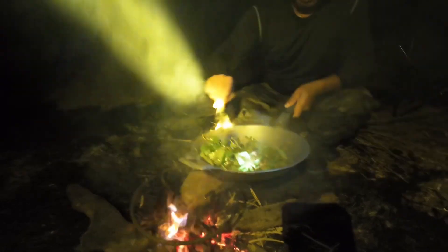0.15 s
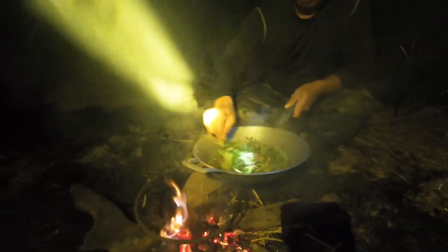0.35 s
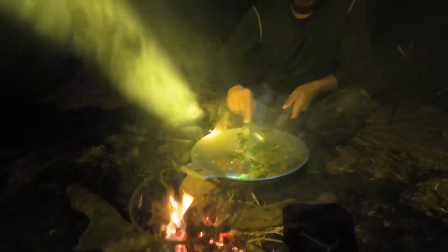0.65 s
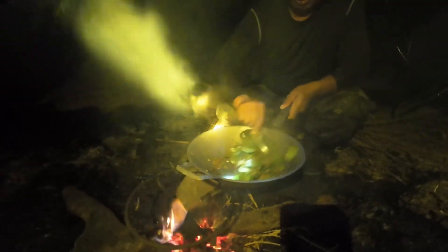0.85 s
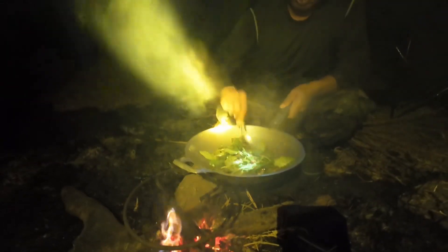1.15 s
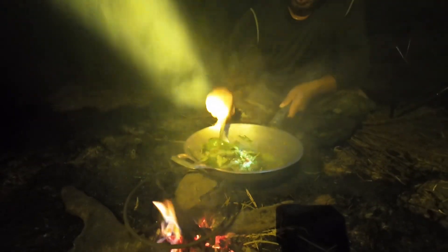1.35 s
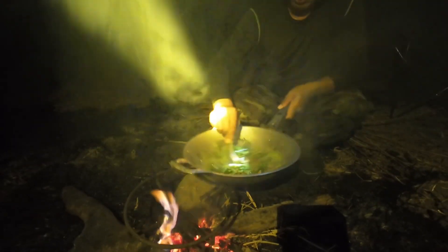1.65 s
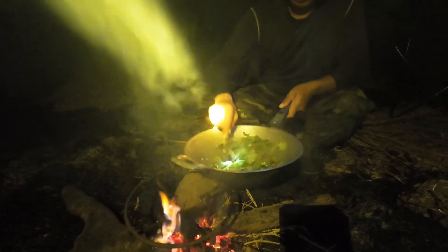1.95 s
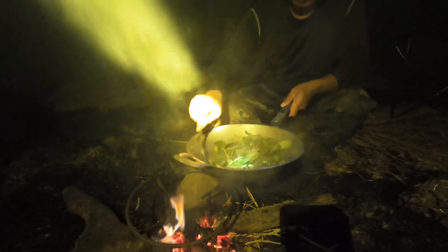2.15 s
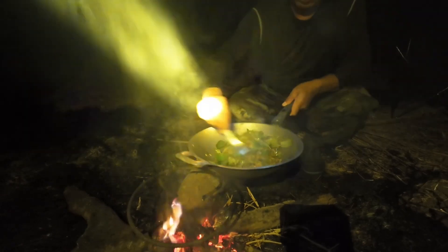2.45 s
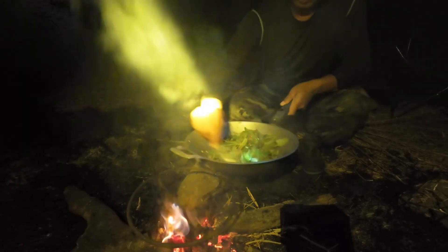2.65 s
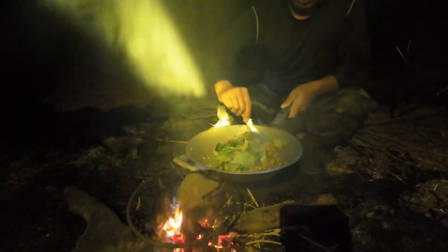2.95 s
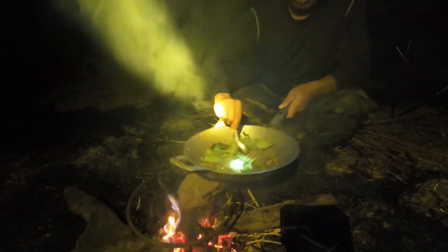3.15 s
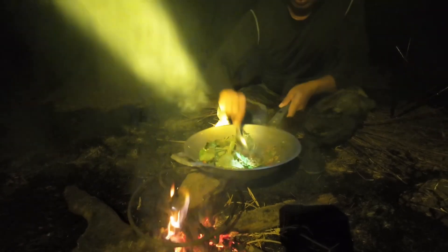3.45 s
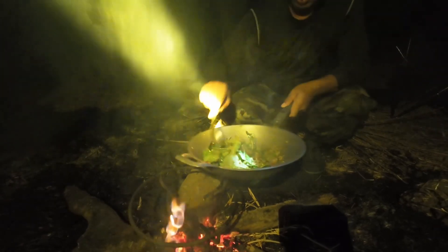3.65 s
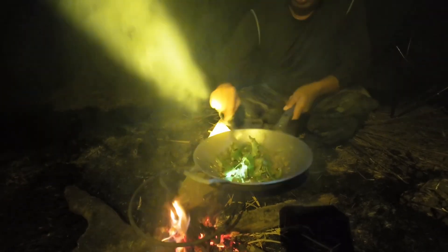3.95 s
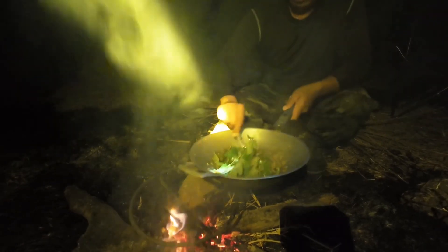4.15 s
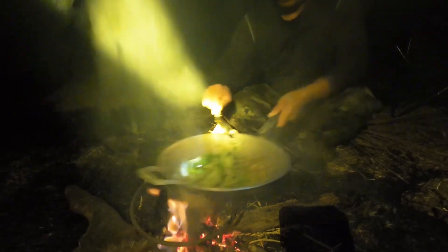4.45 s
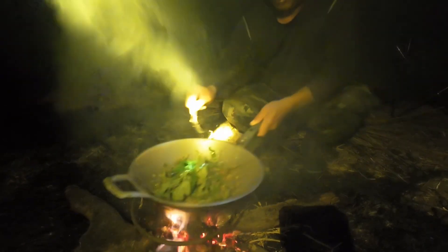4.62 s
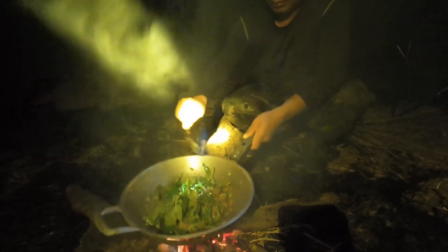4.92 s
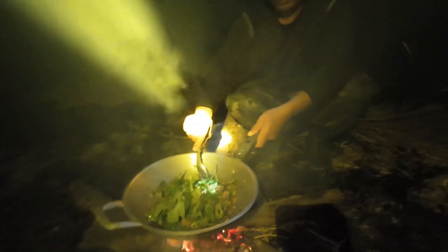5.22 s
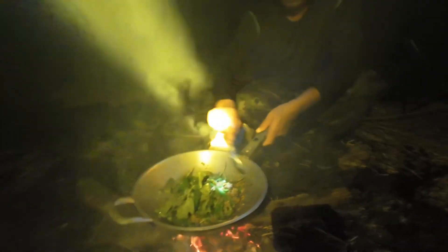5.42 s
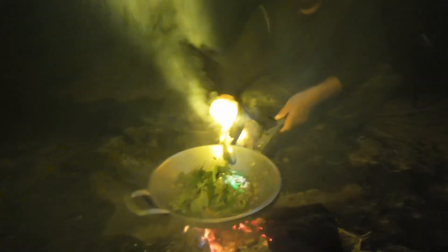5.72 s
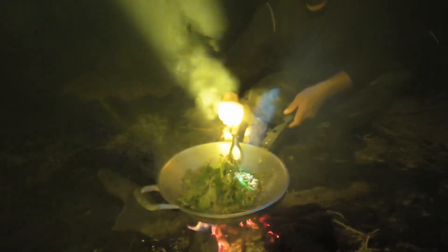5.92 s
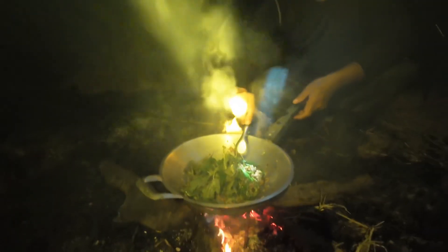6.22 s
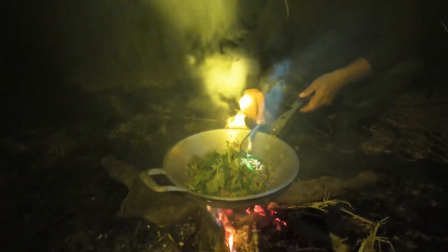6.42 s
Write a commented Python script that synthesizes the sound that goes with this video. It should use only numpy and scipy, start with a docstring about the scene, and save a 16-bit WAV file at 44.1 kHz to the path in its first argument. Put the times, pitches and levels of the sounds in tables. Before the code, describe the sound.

Greens sizzle in a pan over a fire while crickets trill, and a metal spoon taps and scrapes the pan.

```python
"""A field at night, the microphone by a metal pan on a small fire. From the start greens sizzle in fat over
night air, a low hum and a far buzzing chorus; close by a tree cricket trills, wing scraped on wing, and
others chirp further off, echoed by bushes and banks. Fat spits, and at 0.3 s a spoon strikes the pan.
Near 2 s the spoon scrapes and squeaks and the pan knocks on its stones. Towards 5 s the fire flares;
the hardest knock follows, then a run of ringing taps and scrapes."""
import sys
import numpy as np
from scipy import signal
from scipy.fft import rfft, irfft
from scipy.io import wavfile

SR = 44100
rng = np.random.default_rng(int(sys.argv[2]) if len(sys.argv) > 2 else 0)


def pcm_store(signal):
    """Save signal as 16-bit PCM."""
    levels = np.round(np.clip(np.atleast_2d(signal), -1, 1) * 32767)
    wavfile.write(sys.argv[1], SR, levels.astype(np.int16).T)


N = 290178

# night air over the field: (frequency [Hz], relative level [dB])
AIR_SPECTRUM = [(20, -6), (60, -2), (130, -15.5), (230, -34), (500, -32.5), (1100, -31), (1600, -25),
                (2600, -19.5), (4500, -31), (7000, -28), (16000, -37)]
# stereo width of air, fire and sizzle at the microphone: (frequency [Hz], side minus mid [dB])
STEREO_WIDTH = [(60, -5.5), (110, -13.5), (200, 0.5), (380, -4.5), (700, -9.5), (1290, -33), (2380, -41),
                (4400, -11), (8120, -15), (15000, -8)]
# partials of the low hum: (frequency [Hz], width [Hz], level [dB])
HUM_PARTIALS = [(61, 7.7, -51), (117.4, 6.2, -63), (178.5, 2.7, -67.5)]
# rumble of the fire: (time [s], level [dB])
FIRE_LEVELS = [(4.6, -66), (4.8, -50), (5.4, -50), (5.65, -45.5), (6.15, -47.5), (6.35, -57)]
# far chorus: (centre [Hz], width [Hz], pulse rate [Hz], pulse depth [0-1])
CHORUS_BUZZ = (2139, 214, 140, 0.57)
# steady frying: (time [s], level [dB])
SIZZLE_LEVELS = [(0, -45.5), (.7, -50), (1.3, -51.5), (1.75, -49), (2.45, -48.5), (3.1, -44), (3.6, -45),
                 (4.3, -45), (4.85, -45), (5.4, -42.5), (5.75, -45), (6.3, -41.5), (6.58, -47)]
# surges as wet leaves are turned onto hot metal: (peak time [s], level [dB])
SIZZLE_SURGES = [(0, -40.5), (1.36, -36.5), (1.66, -46.5), (2.56, -43.5), (2.94, -40), (3.95, -42.5),
                 (4.2, -59)]
# frying fat: (frequency [Hz], relative level [dB])
SIZZLE_SPECTRUM = [(700, -23.5), (1500, -8.5), (3000, 2.5), (6000, -3), (8000, -2.5), (10000, 0.5),
                   (11500, -3.5), (13200, 2), (14500, -1.5), (16000, 0)]

# one wing stroke of each cricket:
# (start pitch [Hz], end pitch [Hz], length [s], left minus right [dB], right lag [s], roughness [0-1])
NEAR_STROKE = (3640, 3230, .0235, 2.3, -.00002, .15)
HIGH_STROKE = (6450, 5950, 0.018, 6.5, 0.000039, 0.64)
NEIGHBOUR_STROKE = (6000, 5500, 0.02, 7.6, 0.000043, 0.32)
THIN_STROKE = (5450, 4650, .03, 2.5, .00002, .05)
LOW_STROKE = (2970, 2540, .045, -1.5, 0, .05)
# near cricket, a list of guiding strokes for each trill: (time [s], level [dB])
NEAR_TRILLS = [
    [(0.025, -31.5), (0.837, -34.5), (1.454, -31), (1.857, -33), (1.927, -31.5)],
    [(2.172, -32.5), (2.763, -31), (3.168, -30.5), (4.177, -32), (4.979, -32.5), (5.588, -31.5),
     (5.999, -34.5), (6.202, -32), (6.379, -32)],
]
# high cricket further off: (first stroke [s], level [dB])
FAR_HIGH_CHIRPS = [(0.027, -48), (0.223, -45), (0.476, -45.5), (0.725, -46), (0.97, -44), (1.266, -44.5),
                   (1.515, -45), (1.763, -46), (2.069, -45), (2.52, -43), (2.765, -43.5), (3.021, -43.5),
                   (3.261, -44), (3.523, -42), (3.779, -43), (4.019, -42), (4.282, -42.5), (4.526, -43.5),
                   (4.819, -43.5), (5.062, -45), (5.328, -44.5), (5.643, -42), (5.894, -39.5), (6.221, -42),
                   (6.471, -41)]
# thin and low crickets further off: (first stroke [s], length [s], level [dB])
FAR_THIN_PHRASES = [(.22, .045, -45), (.55, .15, -49), (.865, 0.093, -49), (1.175, .14, -52.5),
                    (3.373, 0.18, -49.5), (3.70, .153, -50), (3.985, 0.07, -51), (4.254, .154, -47.5),
                    (4.575, 0.2, -52), (4.896, .051, -52), (6.163, .114, -46), (6.408, 0.065, -45.5)]
FAR_LOW_PHRASES = [(1.845, .076, -46), (2.367, .153, -42.5), (2.894, .072, -42), (3.242, .073, -41.5),
                   (3.764, .083, -43), (4.734, 0, -46), (5.051, 0, -40), (5.638, 0, -41)]
# reflections off bushes and banks: (delay [s], gain [dB])
FIELD_ECHOES = [(.009, -14), (.017, -10.5), (.033, -11.5)]

# spits of fat: (time [s], level [dB])
FAT_SPITS = [(0.1535, -28.5), (0.6197, -36), (0.841, -30), (0.8574, -31.5), (1.0849, -35), (1.5225, -22.5),
             (1.7714, -28.5), (2.6768, -31), (3.1388, -27.5), (3.4416, -27.5), (3.69, -29), (4.1563, -25),
             (4.1912, -26.5), (4.5185, -30), (5.4768, -29), (5.691, -28), (5.7091, -24), (6.2914, -30)]
# pan against its stones: (time [s], level [dB], body pitch [Hz], t60 [s])
STONE_KNOCKS = [(.155, -52.5, 596, 0.054), (1.258, -49.5, 216, 0.14), (1.964, -32.5, 506, 0.072),
                (2.659, -42.5, 410, 0.058), (4.77, -56.5, 664, 0.14), (4.9762, -17.5, 180, 0.041),
                (4.976, -13.5, 662, 0.02), (4.999, -26, 650, 0.065), (5.034, -32, 442, 0.026),
                (5.075, -29.5, 204, 0.04), (5.841, -29, 700, 0.04)]
# spoon striking the pan: (time [s], crack level [dB], crack t60 [s], bowl ring [dB], rim ring [dB],
# bowl pitch favoured by the spot [Hz])
SPOON_TAPS = [(0.3217, -4.5, 0.025, -26, -24, 1180), (2.2555, -46, 0.0082, -52, -44, 790),
              (5.1367, -6, 0.027, -33, -24.5, 2210), (5.5349, -5.5, 0.041, -20.5, -49, 1630),
              (5.578, -36, 0.017, -21, -41, 2280), (5.8598, -15, 0.0065, -30, -35, 2364),
              (6.157, -30, 0.017, -52.5, -57, 1410), (6.363, -23.5, 0.0095, -41.5, -68, 1270)]
# spoon rubbing the pan, levels relative: (touch [s], speeding up [s], contact [s], fastest scrape [dB],
# its fall [dB/s], grind at touch [dB], at lift [dB], hollow pitch at touch [Hz], at lift [Hz])
SPOON_STROKES = [(.326, 0.0012, 0.097, -29.5, 250, -35, -78, 1200, 780),
                 (1.964, 0, 0.06, -31, 7, -45, -50, 598, 870),
                 (2.255, 0, .15, -40.5, 26, -54, -69, 797, 600),
                 (2.659, 0.13, .14, -32, 30, -49.5, -55.5, 1228, 1300),
                 (4.985, 0.014, .125, -39.5, 45, -46.5, -49, 800, 670),
                 (5.145, 0.053, 0.15, -17.5, 173, -30.5, -27.5, 1313, 760),
                 (5.539, 0.021, 0.0521, -27, 60, -27.5, -23.5, 1096, 720),
                 (5.606, 0, 0.033, -27.5, 112, -32, -41, 801, 640),
                 (5.863, 0, 0.11, -47, 110, -33.5, -57, 839, 540)]
# modes of bowl, spoon and rim: (frequency [Hz], relative level [dB], t60 [s])
PAN_MODES = [(622, -7.5, 0.29), (790, -9, 0.17), (970, -35, 0.1), (1170, -1.5, 0.049), (1376, -7.5, 0.099),
             (2156, -2, 0.13), (2460, -11, 0.11), (2875, -7.5, 0.11), (3670, 0, 0.089), (4270, -25, 0.052),
             (4450, -9, 0.11), (5070, -0.5, 0.096), (5340, 1, 0.057), (5840, -3, 0.032), (6100, -1, 0.048),
             (6350, 3, 0.048), (7300, -26, 0.017), (7400, -14, 0.028), (7700, 4, 0.041), (8430, -9, 0.015),
             (9750, -11, 0.053)]
# the spoon's edge singing: (start [s], end [s], pitch [Hz], level [dB])
EDGE_SQUEAK = (1.965, 2.03, 2830, -37)


def from_db(db):
    """Decibels to gain."""
    return 10 ** (np.asarray(db) / 20)


def rms_one(x):
    """Scale to rms 1."""
    return x / np.sqrt(np.mean(x ** 2) + 1e-20)


def in_time(rows):
    """Join (time, value) rows by straight lines."""
    return np.interp(np.arange(N) / SR, *np.transpose(rows))


def drift(rate_hz):
    """Smooth random wander of rms 1."""
    pole = np.exp(-40 * np.pi * rate_hz / SR)
    slow = signal.lfilter([1], [1, -2 * pole, pole * pole], rng.standard_normal(N // 20 + 4002))[4000:]
    return np.interp(np.arange(N) / 20, np.arange(len(slow)), rms_one(slow))


def colour(x, spectrum):
    """Shape a signal by (frequency [Hz], level [dB]) rows."""
    hz, db = np.transpose(spectrum)
    log_hz = np.log(np.fft.rfftfreq(N, 1 / SR) + 1)
    return irfft(rfft(x) * from_db(np.interp(log_hz, np.log(hz), db)), N)


def wide(mid, side, spectrum):
    """Mid and side become a coloured left-right pair of mid rms 1."""
    mid, side = colour(np.array([mid, colour(side, STEREO_WIDTH)]), spectrum)
    return np.array([mid + side, mid - side]) / np.std(mid)


def band(x, low_hz, high_hz):
    """Band-pass."""
    return signal.sosfilt(signal.butter(2, [low_hz, high_hz], "band", fs=SR, output="sos"), x)


def ring(drive, hz, t60):
    """One mode: a unit click starts a decaying sine of height 1."""
    r, w = from_db(-60 / (t60 * SR)), 2 * np.pi * hz / SR
    return signal.lfilter([0, np.sin(w)], [1, -2 * r * np.cos(w), r * r], drive + 1e-18)


def panned(x, left_db):
    """Place a sound left or right of the microphone."""
    return x * from_db([[left_db / 2], [-left_db / 2]])


def night_air(level_db=-52):
    """Steady noise of the open field."""
    return from_db(level_db) * wide(*rng.standard_normal((2, N)), AIR_SPECTRUM)


def low_hum():
    """Three narrow bands of noise make a wavering hum."""
    return sum(from_db(db) * rms_one(ring(rng.standard_normal(N), hz, t60=2.27 / width))
               for hz, width, db in HUM_PARTIALS)


def fire():
    """The fire under the pan rumbles, very faintly until it flares."""
    rumble = band(rng.standard_normal((2, N)), 50.5, 108)
    return from_db(in_time(FIRE_LEVELS)) * wide(*rumble, spectrum=[(20, 7), (130, -1.5), (300, -17)])


def far_chorus(level_db=-54):
    """Distant insects merge into one narrow, fast-pulsing buzz."""
    hz, width, rate, depth = CHORUS_BUZZ
    pulse_hz = rate * (1 + 0.011 * drift(5.0))
    pulses = 1 + depth * np.sin(2 * np.pi * np.cumsum(pulse_hz) / SR)
    buzz = band(rng.standard_normal(N) * pulses, hz - width / 2, hz + width / 2)
    return from_db(level_db + drift(0.89)) * rms_one(buzz)


def sizzle(bursts_per_s=1500, rise_db_per_s=200, fall_db_per_s=41):
    """Tiny bursts of steam in fat over a hiss; steady frying and surges add in power."""
    t = np.arange(N) / SR
    sizes = from_db(4.5 * np.minimum(rng.exponential(1, (2, N)), 5)) * rng.standard_normal((2, N))
    bursts = sizes * (rng.random((2, N)) < bursts_per_s / SR)
    hiss = rng.standard_normal((2, N))
    surges = [db - np.where(t < s, rise_db_per_s * (s - t), fall_db_per_s * (t - s))
              for s, db in SIZZLE_SURGES]
    level = np.sqrt(np.sum(from_db([in_time(SIZZLE_LEVELS), *surges]) ** 2, axis=0))
    flicker = from_db(1.97 * drift(31))
    return level * flicker * wide(*(bursts + hiss), SIZZLE_SPECTRUM)


def wing_strokes(strokes, shape):
    """Each (time, level) stroke is a whistle that falls as the scraper slows along the wing's file."""
    start_hz, end_hz, length, left_db, lag, roughness = shape
    out = np.zeros((2, N + SR))
    for (s, db), (pitch, size, shift, phase) in zip(strokes, rng.standard_normal((len(strokes), 4))):
        progress = np.linspace(0, 1, int(length * (1 + 0.044 * size) * SR))
        hz = (start_hz + (end_hz - start_hz) * progress ** 1.42) * (1 + .004 * pitch)
        angle = 2 * np.pi * (np.cumsum(hz) / SR - hz * [[0], [lag]]) + 9 * phase
        arch = np.abs(np.sin(np.pi * progress)) ** 0.91
        at = max(int((s + 0.001 * shift) * SR) - len(arch) // 2, 0)
        out[:, at:at + len(arch)] += from_db(db + 0.51 * size) * arch * np.sin(angle)
    return panned(out[:, :N] * (1 + roughness * drift(216)), left_db)   # teeth slip unevenly


def stroke_times(first_s, last_s, gap_s, slowing=1):
    """Strokes about gap_s apart; slowing above 1 spreads them towards the end."""
    count = round((last_s - first_s) / gap_s) + 1
    return first_s + (last_s - first_s) * np.linspace(0, 1, count) ** slowing


def near_cricket(gap_s=.0336, soft_start_db=-4.5):
    """A tree cricket close to the microphone; each trill begins softly and wavers a little."""
    strokes, waver_db = [], 0.56 * drift(3.9)
    for s, db in map(np.transpose, NEAR_TRILLS):
        times = np.concatenate([stroke_times(a, b, gap_s)[:-1] for a, b in zip(s, s[1:])] + [s[-1:]])
        onset_db = soft_start_db * np.exp(-(times - s[0]) / .04)
        strokes += zip(times, np.interp(times, s, db) + onset_db + waver_db[(times * SR).astype(int)])
    return wing_strokes(strokes, NEAR_STROKE)


def chirping_cricket(chirps, shape, gap_s=.027):
    """Four wing strokes to a chirp."""
    return wing_strokes([(s + k * gap_s, db) for s, db in chirps for k in range(4)], shape)


def phrasing_cricket(phrases, shape, gap_s, first_db, slowing=1):
    """Phrases of slower wing strokes, the first of each offset by first_db."""
    strokes = [(s, db + first_db * (s == start)) for start, length, db in phrases
               for s in stroke_times(start, start + length, gap_s, slowing)]
    return wing_strokes(strokes, shape)


def far_crickets():
    """Further out in the field: a high cricket, its regular neighbour, then a thin and a low one."""
    high = chirping_cricket(FAR_HIGH_CHIRPS, HIGH_STROKE)
    neighbour = chirping_cricket([(.07 + k * .2195, -45) for k in range(30)], NEIGHBOUR_STROKE)
    thin = phrasing_cricket(FAR_THIN_PHRASES, THIN_STROKE, gap_s=.05, first_db=1.5, slowing=1.1)
    low = phrasing_cricket(FAR_LOW_PHRASES, LOW_STROKE, gap_s=.076, first_db=-1)
    return high + neighbour + thin + low


def field_echoes(calls):
    """Bushes and banks return the calls to the opposite side of the microphone."""
    return sum(from_db(db) * np.roll(calls[::-1], int(s * SR), axis=1) for s, db in FIELD_ECHOES)


def fat_spits(decay_s=0.0011):
    """Hot fat spits in single sharp bursts, near the centre."""
    spits, burst = np.zeros((2, N)), np.exp(-np.arange(200) / (decay_s * SR))
    for (s, db), left_db in zip(FAT_SPITS, rng.normal(0, 0.9, len(FAT_SPITS))):
        at = int(s * SR)
        spits[:, at:at + 200] += panned(from_db(db) * burst * rng.standard_normal(200), left_db)
    return band(spits, 1740, 19000)


def stone_knocks():
    """The loaded pan knocks on its stones: a brief dull ring with a grit of noise."""
    out, t = np.zeros(N), np.arange(SR // 5) / SR
    for s, db, hz, t60 in STONE_KNOCKS:
        # the pitch falls: stiff at first contact, then softer
        body = np.sin(2 * np.pi * hz * (t + 0.0011 * (1 - np.exp(-t / 0.0025))))
        grit = 0.78 * rms_one(band(rng.standard_normal(len(t)), hz / 3, hz * 1.26))
        at = int(s * SR)
        out[at:at + len(t)] += from_db(db - 60 * t / t60) * (body + grit)
    return out


def tap_cracks():
    """The spoon hits the metal with a broad crack of noise."""
    cracks, t = np.zeros(N), np.arange(SR // 10) / SR
    for s, db, t60, *_ in SPOON_TAPS:
        at = int(s * SR)
        cracks[at:at + len(t)] += from_db(db - 60 * t / t60) * rng.standard_normal(len(t))
    return band(cracks, 1660, 11300)


def pan_ring(friction, scrape_gain, grind_gain, bowl_below_hz=2600):
    """Taps ring all modes; grinding also drives the bowl's, scraping those of spoon and rim."""
    tap_s, _, _, bowl_db, rim_db, spot_hz = np.transpose(SPOON_TAPS)
    at, out = (tap_s * SR).astype(int), np.zeros(N)
    for hz, mode_db, t60 in PAN_MODES:
        if hz < bowl_below_hz:
            drive = from_db(mode_db - 36) * friction * grind_gain
            tap_db = bowl_db - 9 * np.log2(hz / spot_hz) ** 2
        else:
            drive = from_db(mode_db - 39) * friction * scrape_gain
            tap_db = rim_db
        drive[at] += from_db(tap_db + mode_db + rng.normal(0, 4, len(at)))
        out += ring(drive, hz, t60)
    return out


def spoon_motion(swell_db_per_s=398, scrape_lift_db_per_s=2500, grind_lift_db_per_s=802):
    """Scrape gain, grind gain and hollow pitch: the scrape grows with speed, both die on lifting."""
    t, scrape_gain, grind_gain, pitches = np.arange(N) / SR, np.zeros(N), np.zeros(N), []
    for touch, swell, contact, peak_db, fall, touch_db, lift_db, touch_hz, lift_hz in SPOON_STROKES:
        since = t - touch
        lifted = np.maximum(since - contact, 0)
        speed_db = np.where(since < swell, swell_db_per_s * (since - swell), fall * (swell - since))
        grind_db = np.interp(since, [0, contact], [touch_db, lift_db])
        scrape_gain += (since >= 0) * from_db(peak_db + speed_db - scrape_lift_db_per_s * lifted)
        grind_gain += (since >= 0) * from_db(grind_db - grind_lift_db_per_s * lifted)
        pitches += [(touch, touch_hz), (touch + contact, lift_hz)]
    return scrape_gain, grind_gain, in_time(pitches)


def spoon_rub(friction, scrape_gain, grind_gain, hollow_hz):
    """A bright scrape, a dull grind and the hollow note of air under the spoon, gliding as it tilts."""
    scrape = from_db(2) * scrape_gain * band(friction, 3640, 11100)
    grind = from_db(6) * grind_gain * band(friction, 650, 2370)
    hollow = from_db(-6.5) * grind_gain * drift(120) * np.sin(2 * np.pi * np.cumsum(hollow_hz) / SR)
    return scrape + grind + hollow


def spoon_squeak():
    """The spoon's edge sings one short, unsteady note."""
    start, end, hz, db = EDGE_SQUEAK
    t = np.arange(N) / SR
    level = from_db(db) * ((t > start) & (t < end)) * (1 + .7 * drift(60))
    return level * np.sin(2 * np.pi * (hz * t + .2 * drift(25)))


def spoon_on_pan():
    """All the spoon's sounds; the wide pan's treble reaches the microphone's two sides unequally."""
    scrape_gain, grind_gain, hollow_hz = spoon_motion()
    friction = rng.standard_normal((2, N)) * from_db(2.65 * drift(160))
    mid = tap_cracks() + pan_ring(friction[0], scrape_gain, grind_gain)
    mid += spoon_rub(friction[1], scrape_gain, grind_gain, hollow_hz) + spoon_squeak()
    side = from_db(-9) * band(np.roll(mid, 31) + np.roll(mid, 113), 7500, 16000)
    return np.array([mid - side, mid + side])


def scene():
    """The field all round and the cooking close by; the near cricket carries less echo."""
    far, near = far_crickets(), near_cricket()
    crickets = near + far + field_echoes(far + from_db(-9.5) * near)
    field = crickets + far_chorus() + night_air() + low_hum()
    return field + fire() + sizzle() + fat_spits() + spoon_on_pan() + stone_knocks()


def record(dry, cutoff_hz=16100):
    """The microphone's signal clips at full scale and loses its highest treble."""
    return signal.sosfilt(signal.cheby2(12, 70, cutoff_hz, fs=SR, output="sos"), np.clip(dry, -1, 1))


dry = scene()
out = record(dry)
pcm_store(out)
```